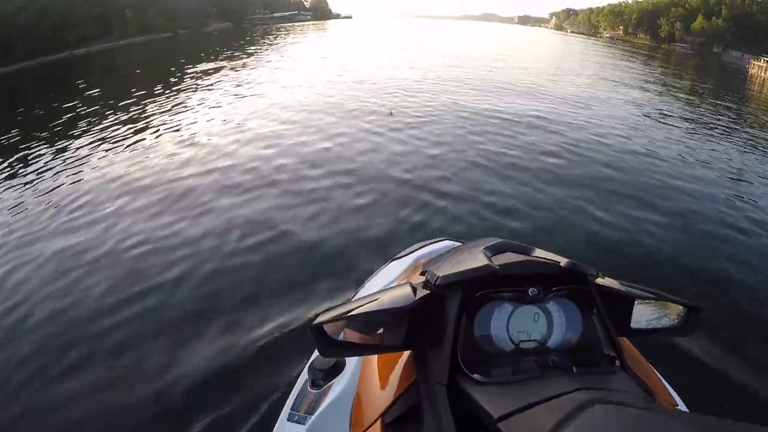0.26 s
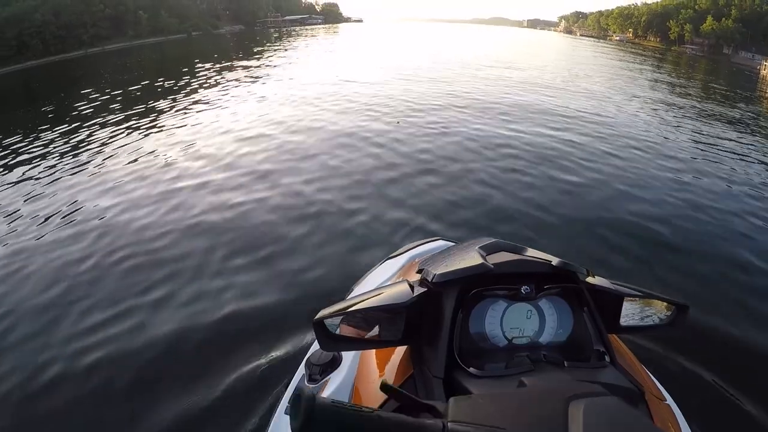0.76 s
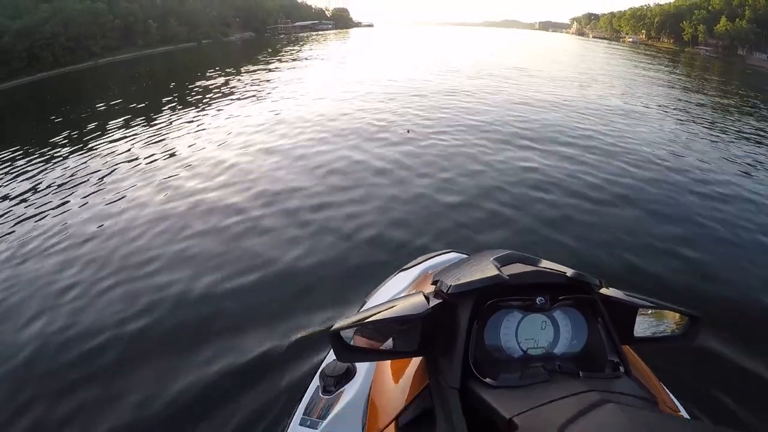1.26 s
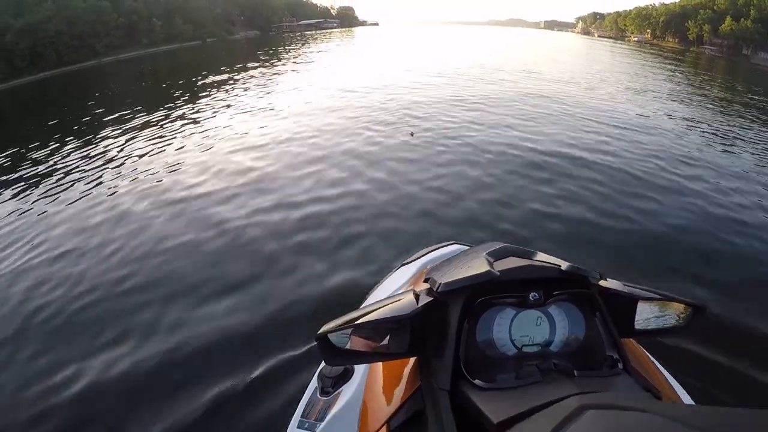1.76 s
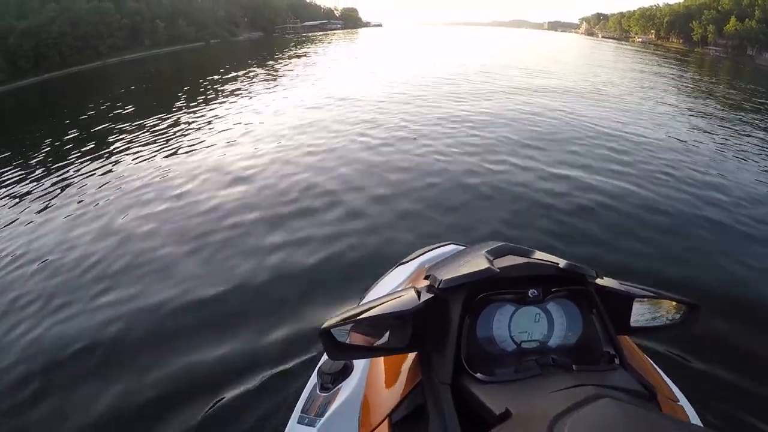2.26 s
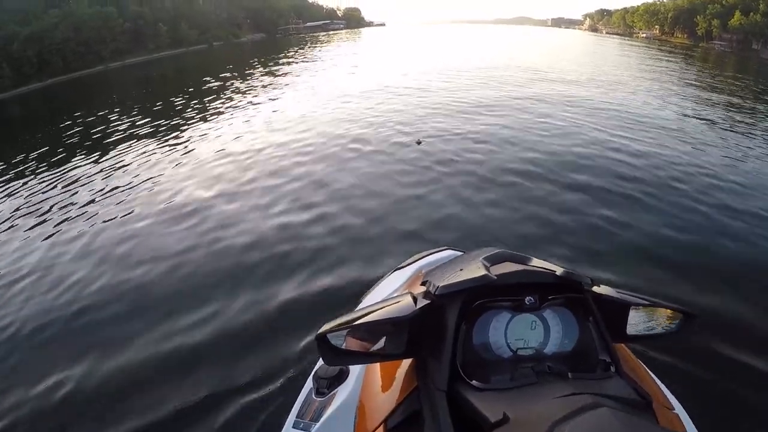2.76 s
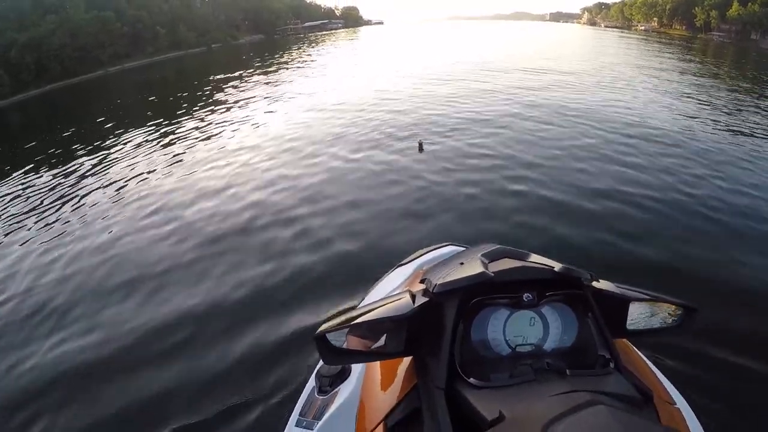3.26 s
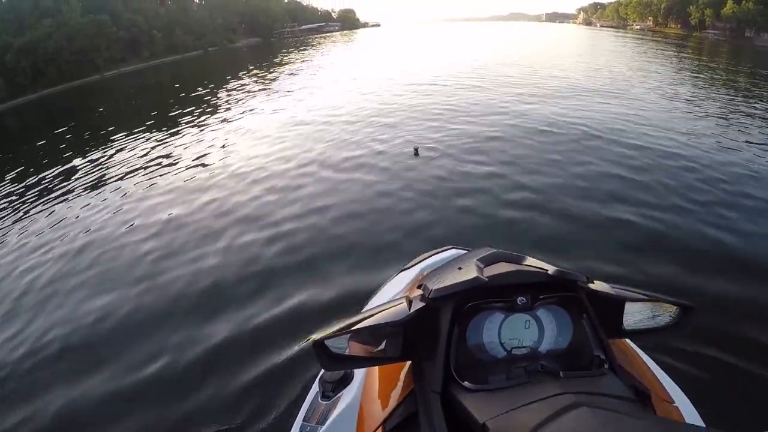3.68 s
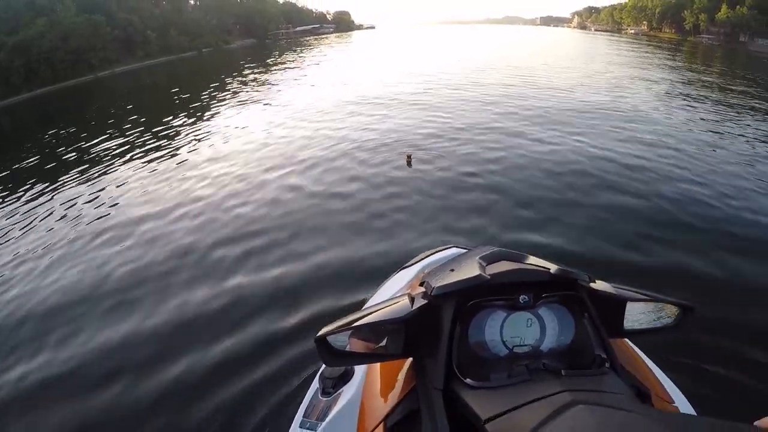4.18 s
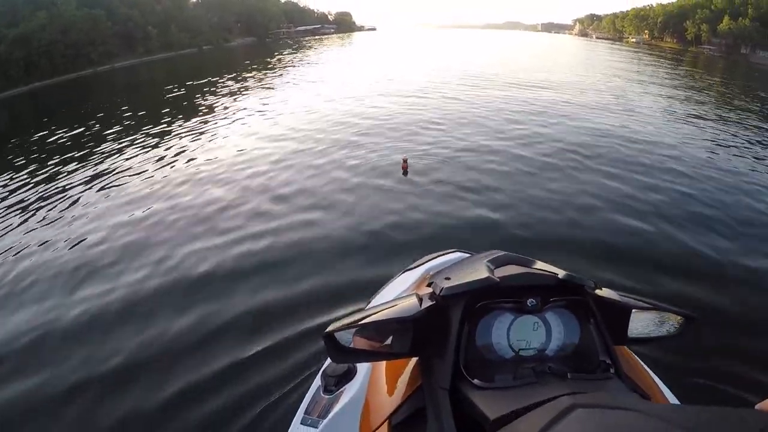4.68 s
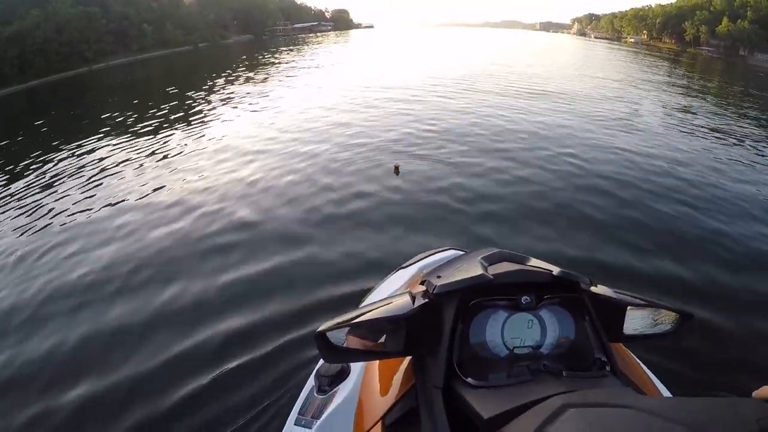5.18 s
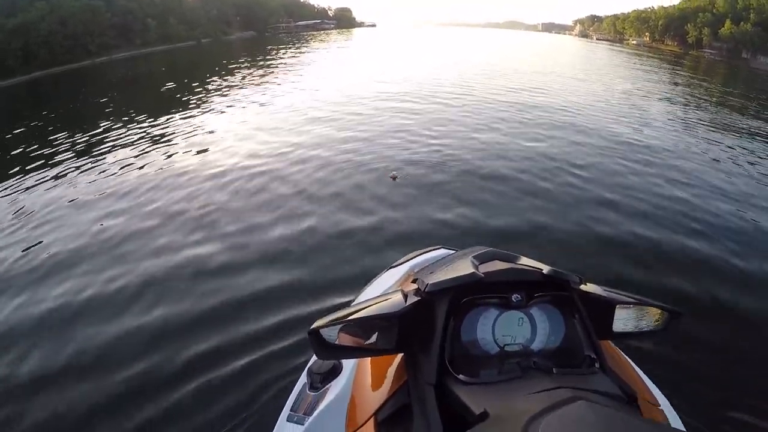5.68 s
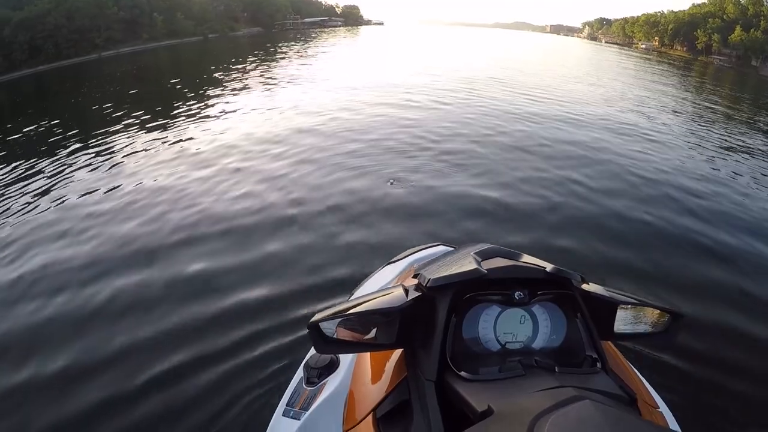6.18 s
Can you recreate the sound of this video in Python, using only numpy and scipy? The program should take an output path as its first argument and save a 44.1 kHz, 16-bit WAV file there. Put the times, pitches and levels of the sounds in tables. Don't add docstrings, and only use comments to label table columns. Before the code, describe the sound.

A low, warm engine hum runs throughout without revving, wavering slightly several times a second. Beneath it are rough exhaust rumble, intake growl and a faint cowl buzz; above it, light metallic ticking. Soft water fizz and bubble patter surround the hull, and a brief gurgling splash comes near four seconds. Close stereo pickup on the rider's head, open outdoors, no echo.

```python
import sys
import numpy as np
from scipy import signal
from scipy.fft import rfft, irfft
from scipy.io import wavfile
from scipy.ndimage import uniform_filter1d

SR = 44100
rng = np.random.default_rng(int(sys.argv[2]) if len(sys.argv) > 2 else 0)


def to_wav(s):
    ch = np.atleast_2d(s).T
    pcm = np.round(np.clip(ch, -1, 1) * 32767)
    wavfile.write(sys.argv[1], SR, pcm.astype(np.int16))


def elevation(decibels):
    levels = np.asarray(decibels, float)
    return 10 ** (levels / 20)


N = 284356
T = np.arange(N) / SR


def level(x, db):
    return x * elevation(db) / np.sqrt(np.mean(x ** 2))


def walk(rate_hz, size=N, step_hz=SR, count=1):
    k = max(int(step_hz / rate_hz), 1)
    held = np.repeat(rng.standard_normal((count, size // k + 1)), k, axis=1)
    return 1.55 * uniform_filter1d(uniform_filter1d(held, k), k)[:, :size]


def on_hz(table, hz):
    f, v = np.transpose(table)
    return np.interp(np.log(hz + 1), np.log(f + 1), v)


def pan(x, lean_db, lag_samples=6):
    return np.array([np.roll(x, int(lag_samples)) * elevation(lean_db / 2), x * elevation(-lean_db / 2)])


def ring(x, modes):
    out = 0
    for hz, db, t60_s in modes:
        pole = np.exp(2j * np.pi * hz / SR - np.log(1000) / (t60_s * SR))
        out = out + elevation(db) * signal.lfilter([1], [1, -pole], x).imag
    return out


def bumps(at_s, sizes, rise_s, fall_s):
    coarse_s = np.arange(0, N / SR + .01, .005)
    late_s = coarse_s[:, None] - at_s
    bells = np.exp(-.5 * (late_s / np.where(late_s < 0, rise_s, fall_s)) ** 2)
    return np.interp(T, coarse_s, bells @ sizes)


# (frequency [Hz], left minus right [dB])
PORT_LEAN = [(60, 2), (150, 1.5), (280, 2.8), (400, 3.5), (550, -1), (850, -7), (1500, -7.5), (2600, -7.5),
             (4500, 0), (6500, 0.5), (8500, -5.5), (12000, -1.5)]
# (frequency [Hz], shared part [0-1])
PORT_SHARED = [(300, .998), (470, .98), (800, .75), (1050, .4), (1400, .3), (2000, .58), (3400, .5),
               (6400, .35), (7500, .42), (10500, .1)]
# (frequency [Hz], left lead [rad])
PORT_LEAD = [(40, -.25), (330, -.3), (700, -.8), (900, -1.6), (1350, -1.0), (1550, .8), (2500, .3),
             (4400, -.3), (6000, -1.5), (7500, -3), (9800, -3.4)]


def patchy_noise(colour, slow_db, quick_db, quick_rate_hz):
    hz, s, (a, b) = signal.stft(rng.standard_normal((2, N)), SR, nperseg=1024)
    like = np.clip(on_hz(PORT_SHARED, hz), 0, 1)[:, None]
    turn = np.exp(1j * on_hz(PORT_LEAD, hz))[:, None]
    lean = elevation(on_hz(PORT_LEAN, hz) / 2)[:, None]
    band = (3 * np.log2(hz / 40 + 1)).astype(int)
    swell = uniform_filter1d(walk(1.5, len(s), SR / 512, count=32), size=5, axis=0)
    flicker = walk(quick_rate_hz, len(s), SR / 512, count=32)
    swing = elevation(slow_db * swell + quick_db * flicker)[band]
    left = (like * a * turn + np.sqrt(1 - like ** 2) * b) * lean
    ports = signal.istft(np.array([left, a / lean]) * swing, SR, nperseg=1024)[1][:, :N]
    return irfft(rfft(ports) * elevation(on_hz(colour, np.fft.rfftfreq(N, 1 / SR))), N)


# (time [s], speed drop [cycles/s])
SPEED_SAGS = [(-0.03, 0.44), (0.146, 0.62), (0.367, 0.17), (0.638, 0.49), (0.771, 0.26), (0.987, 0.65),
              (1.109, 0.73), (1.442, 0.56), (1.637, 0.72), (1.741, 0.4), (1.922, 0.38), (2.062, 0.72),
              (2.182, 0.21), (2.71, 0.35), (2.837, 0.38), (2.992, 0.36), (3.62, 0.72), (3.789, 0.52),
              (3.936, 0.59), (4.159, 0.29), (4.396, 0.6), (4.631, 0.44), (4.76, 0.72), (4.909, 0.47),
              (5.149, 0.43), (5.435, 0.58), (5.602, 0.6), (5.866, 0.47), (6.232, 0.35)]


def idle_speed():
    sag_width_s = .0617
    return 15.697 - bumps(*np.transpose(SPEED_SAGS), sag_width_s, sag_width_s)


def crank_lines(cycle, lines, slip_cycles):
    out = 0
    mount_lag_cycles, left_lag_cycles = .475, np.array([[.04], [0]])
    speed = np.gradient(cycle) * SR
    for k, db, lean_db, loose_db, db_per_hz in lines:
        turns = k * cycle + slip_cycles * walk(5)[0] - mount_lag_cycles - left_lag_cycles
        swing_db = loose_db * walk(7)[0] + db_per_hz * (speed - speed.mean())
        line = level(np.cos(2 * np.pi * turns) * elevation(swing_db), db)
        out = out + line * elevation(np.array([[lean_db], [-lean_db]]) / 2)
    return out


# (multiple of cycle [1], rms [dB], left minus right [dB], unsteadiness [dB], speed slope [dB/Hz])
ROCKING = [(2, -59, 4.3, 1.4, 1), (4, -47, 3.0, .8, -3), (6, -74, 2.3, 3, 0)]
HULL_REBOUND = [(5, -67, 2.7, 1.5, 0)]
FIRING_LINE = [(3, -53.6, 2.5, 1.1, 5)]


def hum(cycle):
    crank = cycle + .445
    rocking = crank_lines(crank, ROCKING, .01) - crank_lines(crank, HULL_REBOUND, 0.018)
    return rocking + crank_lines(cycle + .434, FIRING_LINE, 0.009)


# (time [s], drone flare [dB], rumble change [dB])
CATCH_UPS = [(0.101, 5.5, -1), (0.349, 3.5, 0.5), (0.605, 8.5, -0.5), (0.91, 6.5, -0.2), (1.034, 6, 3),
             (1.265, 2, -0.5), (1.415, 6, -0.1), (1.616, 12, -0.8), (1.904, 7.5, -1), (2.052, 6.5, -0.2),
             (2.579, 3.6, 1), (2.758, 8, 1.1), (2.89, 3.0, -2), (2.988, 4.5, 3), (3.58, 11.5, -1.5),
             (3.804, 7.5, -1.5), (3.924, 2, 0.4), (4.084, 5.0, 0.2), (4.305, 6, 0), (4.396, 5, -3),
             (4.609, 8, -1.6), (4.747, 6, 2.5), (4.886, 3, -2), (5.105, 3, -1.2), (5.216, 1.5, -0.3),
             (5.397, 5, -0.5), (5.522, 6.5, 1), (5.622, 2, 0), (5.826, 5.5, -0.5), (6.192, 3, 2.1)]


def drone(cycle):
    at_s, flare_db, _ = np.transpose(CATCH_UPS)
    top_db = -43.5
    db = np.minimum(-53.5 + bumps(at_s, flare_db, rise_s=0.03, fall_s=0.1), top_db)
    turns, under = 18 * cycle - .46, 17 * cycle - .05
    slip_cycles = 0.075 * walk(5)[0] + 0.044 * walk(25)[0]
    main = np.cos(2 * np.pi * (turns + slip_cycles)) * elevation(1.3 * walk(22)[0])
    beat = np.cos(2 * np.pi * (under + 0.18 * walk(6)[0])) * elevation(-10 + 1.2 * walk(7.5)[0])
    return pan(level(main + beat, 0) * elevation(db), 0.33)


# (frequency [Hz], density [dB/Hz])
HULL_COLOUR = [(15, -88.5), (40, -84), (75, -79.5), (105, -82.5), (140, -76.5), (200, -73.5), (245, -79.5),
               (272, -70), (315, -82), (350, -83.5), (400, -83.5), (430, -77), (465, -80), (500, -99)]
# (multiple of cycle [1], rms [dB], left minus right [dB], unsteadiness [dB], speed slope [dB/Hz])
EXHAUST_KNOCK = [(9, -60.5, 1.2, 2.5, 4), (10, -67, 1, 3, 0), (11, -63.5, 1.7, 2.5, 0),
                 (12, -62.5, 2, 2.5, 0), (13, -61.5, 1.4, 2, 0), (14, -65.5, 1.5, 2, 0),
                 (15, -65, 1.4, 2.5, 0), (20, -70, 1, 3, 0), (21, -70, 1.7, 2.5, 0)]
INTAKE_GROWL = [(26, -73, 1.6, 3, 0), (27, -68, 1.6, 2.5, 0), (28, -68.5, 1.6, 2.5, 0),
                (29, -68.5, 1.6, 2.5, 0), (30, -70.5, 1.6, 3, 0)]


def rumble(cycle, speed):
    at_s, _, change_db = np.transpose(CATCH_UPS)
    width_s = 0.088
    db = 2.5 * speed + 0.55 * walk(9)[0] + 1.6 * bumps(at_s, change_db, width_s, width_s)
    beat = 1 + 0.098 * np.cos(6 * np.pi * (cycle + 0.082)) + 0.05 * np.cos(2 * np.pi * (cycle + 0.63))
    colour = [(0.013, -87.5)] + list(HULL_COLOUR) + [(600, -125), (SR, -160)]
    shake = level(patchy_noise(colour, 0.34, 1.0, 9) * beat, -51)
    shake = shake + crank_lines(cycle + .8, EXHAUST_KNOCK, 0.067)
    shake = shake + crank_lines(cycle, INTAKE_GROWL, 0.26)
    panel = pan(level(ring(rng.standard_normal(N), [(146.5, 0, 0.42)]), -62), 0.88)
    deep = signal.sosfiltfilt(signal.butter(2, (105, 245), "band", fs=SR, output="sos"), shake) + panel
    return shake + panel + deep * (elevation(0.65 * (db - db.mean())) - 1)


def cowl():
    modes = [(855.3, -4.5, 0.11), (792, -6.5, 0.064)]
    buzz = ring(rng.standard_normal(N), modes) * elevation(2.0 * walk(18)[0])
    return pan(level(buzz, -73.5), -10.5)


# (frequency [Hz], density [dB/Hz])
WASH_COLOUR = [(480, -5), (580, -7), (870, -12.5), (1080, -12), (2200, -25), (3100, -29.5), (3700, -30),
               (4050, -34.5), (5100, -34.5), (5800, -28.5), (7000, -29.5), (8500, -38.5), (11000, -50.5),
               (14000, -59)]
# (time [s], level [dB])
HULL_FLOW = [(0, -65.5), (.25, -66), (.6, -64.5), (.95, -64.5), (1.35, -67.5), (1.7, -66.5), (2.1, -68),
             (2.7, -65.5), (3.05, -67.5), (3.37, -65.5), (3.65, -67), (4.1, -66), (4.7, -68), (5.2, -65),
             (5.7, -67), (6.05, -64.5), (6.2, -65.5), (6.45, -64)]


def wash(cycle):
    flow_db = np.interp(T, *np.transpose(HULL_FLOW))
    spray_db = 0.5 * flow_db + 0.6 * walk(12)[0]
    colour = [(0, -60), (430, -38)] + list(WASH_COLOUR) + [(SR, -60)]
    water = patchy_noise(colour, .2, .9, 14) * (1 + .09 * np.cos(4 * np.pi * cycle))
    low = signal.sosfilt(signal.butter(2, 3500, fs=SR, output="sos"), water)
    slide = low * elevation(flow_db - flow_db.mean())
    hiss = (water - low) * elevation(spray_db - spray_db.mean())
    return level(slide + hiss, -63.0)


CYLINDER_DB = [-69.5, -74.5, -75.5]
# (time [s], peak [dB], left minus right [dB])
CLEAR_TICKS = [(0.1884, -60.5, 1), (0.232, -59, -4), (.384, -62, -3), (.4484, -62.5, -8), (.641, -60, -2),
               (0.8585, -61, -2), (1.493, -62, -2.5), (1.6907, -62, 3), (1.757, -61, -5),
               (2.347, -61.5, -7), (2.601, -65, 1), (2.642, -61, -2), (2.6862, -58, -6), (2.797, -59.5, -4),
               (2.437, -65, -4), (3.3556, -61, -5), (3.6341, -66, -2), (3.832, -60.5, -3),
               (3.8982, -59.5, -4), (3.9795, -59.5, 2), (4.1142, -61, -2), (4.7452, -59.5, -2),
               (4.943, -62.5, 1), (5.098, -59, -3), (5.1374, -60, -1), (5.3347, -61, 0), (5.462, -58.5, 1),
               (6.0085, -60, 2), (6.329, -62, -9), (6.371, -58.5, 1)]
# (time [s], peak [dB])
LIGHTER_TICKS = [(.122, -63), (.2753, -62), (.5107, -63), (.7506, -64), (.9014, -64), (1.032, -61),
                 (1.297, -63), (1.426, -64), (2.085, -64), (2.1524, -64), (2.304, -64.5), (2.4738, -64),
                 (2.8823, -62), (3.0554, -63.5), (3.38, -61.5), (3.438, -62), (3.9568, -63), (4.0297, -61),
                 (4.3532, -63), (4.4198, -64.5), (4.6158, -63), (5.249, -62.5), (5.291, -63), (5.3572, -65),
                 (5.3978, -63.5), (5.5294, -62.5), (5.8182, -61.5), (6.0514, -61.5), (6.1789, -62),
                 (6.2413, -61)]
# (frequency [Hz], level [dB], t60 [s])
DULL_MODES = [(2000, -2, .013), (2950, 1, .014), (3450, 0, .013), (3780, -3, .011), (4250, -9, .005),
              (4700, -6, .008)]
BRIGHT_MODES = [(5250, -1, .005), (5650, -1, .005), (6200, -2, .004), (6750, -1, .005)]


def ticks(cycle):
    usual_lean_db = -2.5
    light = np.c_[LIGHTER_TICKS, np.full(len(LIGHTER_TICKS), usual_lean_db)]
    s, clear_db, clear_lean_db = np.r_[light, CLEAR_TICKS].T
    beat = np.floor(3 * cycle + .36).astype(int)
    at = np.flatnonzero(np.diff(beat)) + 1
    chance = rng.standard_normal((len(at), 4)).T
    db = np.minimum(np.array(CYLINDER_DB)[beat[at] % 3] + 2.5 * chance[0], -66)
    lean_db = usual_lean_db + 4 * chance[1]
    at = at + (.0006 * SR * chance[3]).astype(int)
    nearest = np.abs(at[:, None] - s * SR).argmin(axis=0)
    at[nearest], db[nearest], lean_db[nearest] = (s + .0009) * SR, clear_db, clear_lean_db
    at = np.clip(at, 0, N - 1)
    bright_db = np.minimum(-65.5 + (db + 63) + 3 * chance[2], -60.5)
    hits = np.zeros((2, N))
    hits[0, at], hits[1, at] = elevation(db), elevation(bright_db)
    bounce = hits + 0.69 * np.roll(hits, int(.0011 * SR), axis=1)
    tick = ring(hits[0], DULL_MODES) * elevation(-6) + ring(bounce[1], BRIGHT_MODES) * elevation(-7.5)
    tick = np.convolve(tick, [.25, .5, .25], "same")
    latest = np.clip(np.searchsorted(at, np.arange(N), "right") - 1, 0, None)
    return pan(tick, lean_db[latest], lag_samples=1)


def chirp(out, s, length_s, hz0, hz1, db, lean_db, skew):
    u = np.arange(int(length_s * SR)) / (length_s * SR)
    tone = np.sin(2 * np.pi * np.cumsum(hz0 + (hz1 - hz0) * u) / SR) * np.sin(np.pi * u ** skew)
    tone *= 1 + .5 * np.sin(2 * np.pi * 46 * (s + u * length_s))
    at = int(s * SR)
    return at, pan(tone * elevation(db), lean_db)[:, :len(out) - at]


# (time [s], length [s], start [Hz], end [Hz], level [dB])
AIR_POCKETS = [
    (1.59, .068, 1350, 1330, -71),
    (2.65, .1, 1330, 1350, -70),
    (2.71, 0.097, 1516, 1446, -72),
    (3.78, 0.044, 1624, 1690, -71),
    (4.03, 0.046, 1620, 1700, -71),
    (4.04, 0.13, 890, 968, -67),
    (4.04, 0.12, 2780, 2830, -78),
    (4.06, .08, 3730, 3720, -78),
    (4.09, .06, 1920, 1980, -73),
]
LEFT_SQUEAKS = [
    (3.825, .06, 3450, 4050, -81),
    (3.84, .035, 3200, 3500, -81),
    (3.875, .04, 4200, 4300, -80),
    (6.33, 0.084, 3300, 4200, -83),
]
# (start [s], end [s])
WAVELET_S = (3.78, 4.18)


def bubbles():
    u = rng.random((700, 4))
    hz = 650 * 2 ** (2.2 * u[:, 1] ** 2)
    start_s = u[:, 0] * (N / SR - .05)
    db = -80 - 7 * np.log2(hz / 650) - 3.5 * np.log(u[:, 2] + .003)
    patter = np.c_[start_s, 16 / hz, hz, 1.15 * hz, db, -10 * u[:, 3]]
    v = rng.random((50, 3))
    fine_hz = 1500 * 2 ** (1.6 * v[:, 1])
    start_s = np.interp(v[:, 0], (0, 1), WAVELET_S)
    db = -80 - 5 * np.log2(fine_hz / 1500) + 5 * v[:, 2]
    splash = np.c_[start_s, 30 / fine_hz, fine_hz, 1.06 * fine_hz, db, np.full(50, -3)]
    pockets = np.c_[AIR_POCKETS, np.full(len(AIR_POCKETS), -9.5)]
    squeaks = np.c_[LEFT_SQUEAKS, np.full(len(LEFT_SQUEAKS), 16.5)]
    out = np.zeros((N, 2))
    for rows, skew in ((patter, .4), (pockets, .8), (splash, .5), (squeaks, .8)):
        for row in rows:
            at, tone = chirp(out, *row, skew)
            out[at:at + tone.shape[1]] += tone.T
    return out.T


def scene():
    speed = idle_speed()
    cycle = np.cumsum(speed) / SR
    engine = hum(cycle) + drone(cycle) + rumble(cycle, speed) + cowl()
    return engine + wash(cycle) + ticks(cycle) + bubbles()


def roll_off(x):
    return signal.sosfilt(signal.butter(12, 15700, fs=SR, output="sos"), x)


def record(dry):
    return roll_off(dry)


dry = scene()
out = record(dry)
to_wav(out)
```